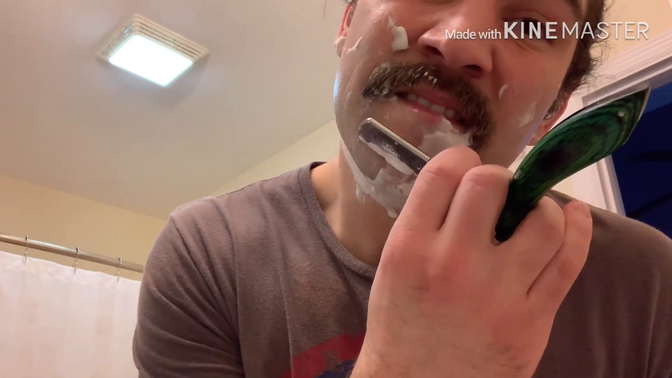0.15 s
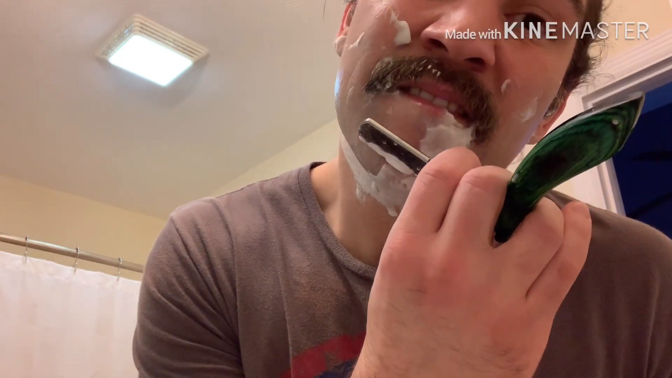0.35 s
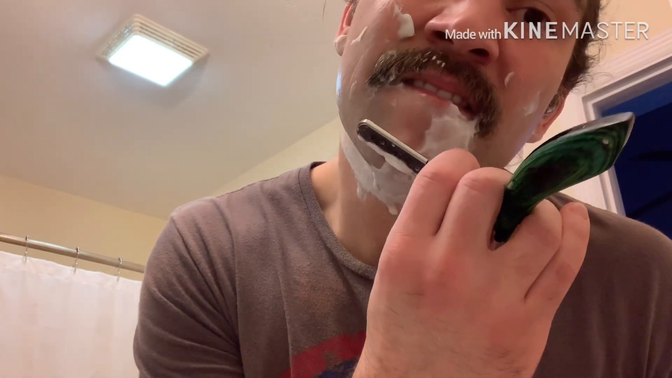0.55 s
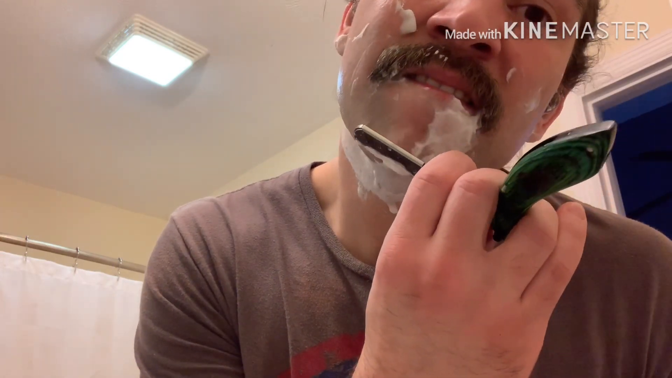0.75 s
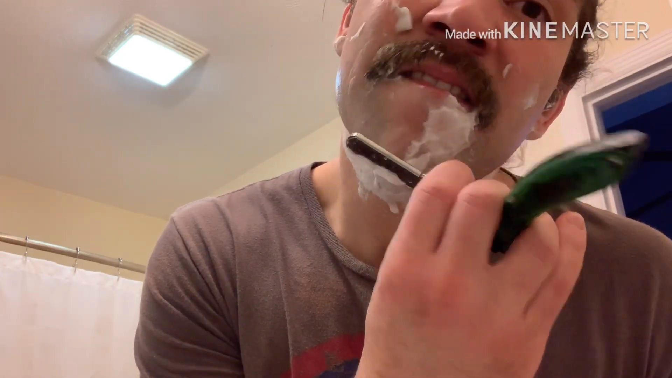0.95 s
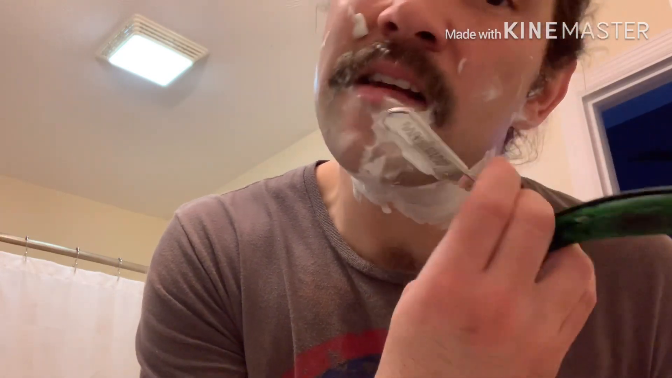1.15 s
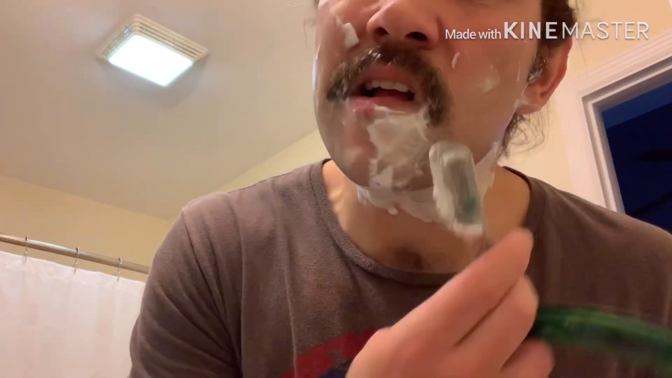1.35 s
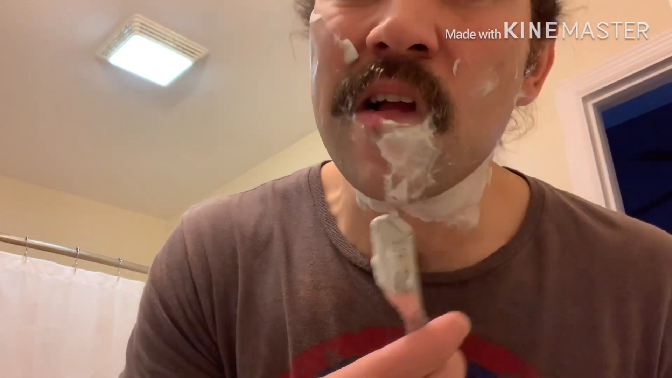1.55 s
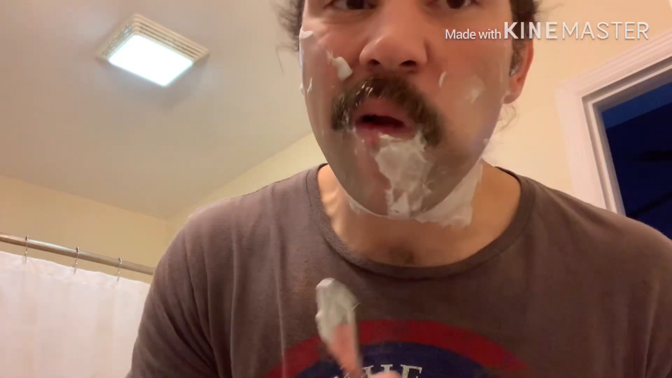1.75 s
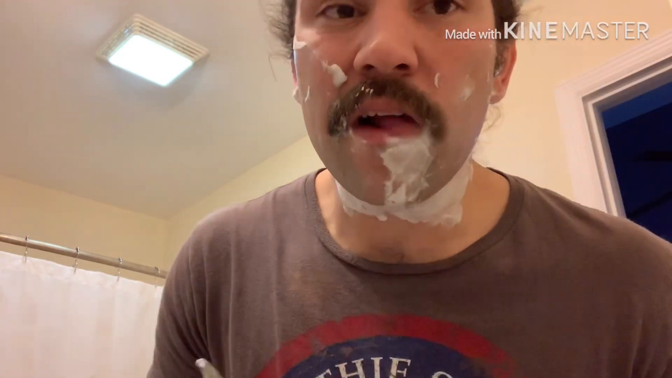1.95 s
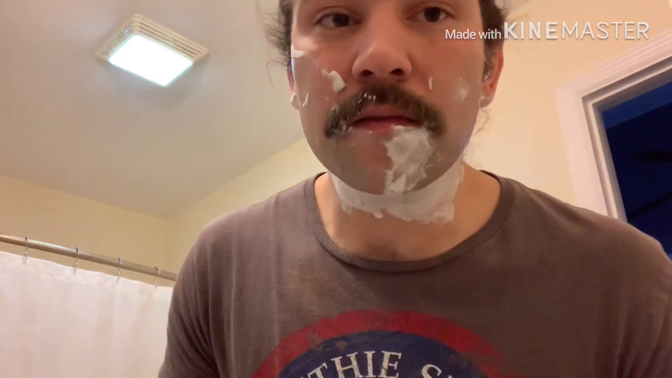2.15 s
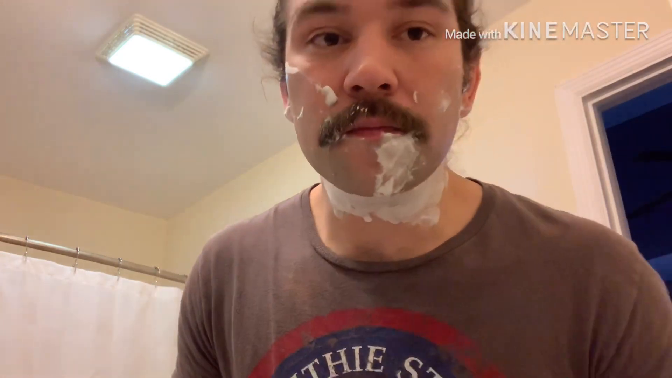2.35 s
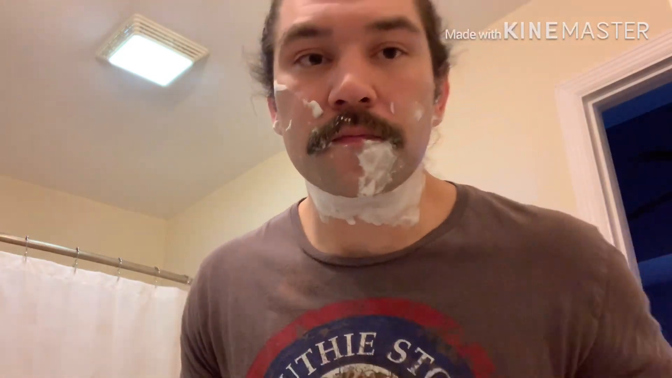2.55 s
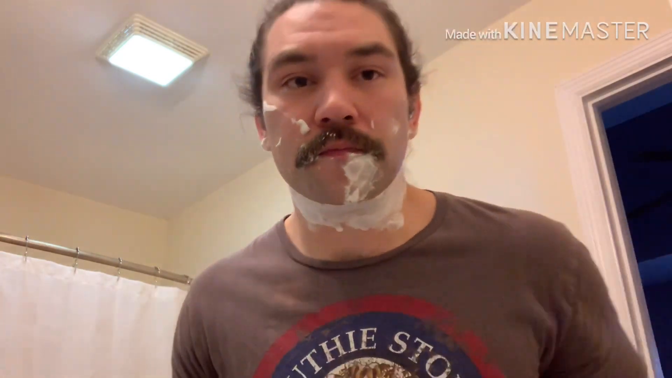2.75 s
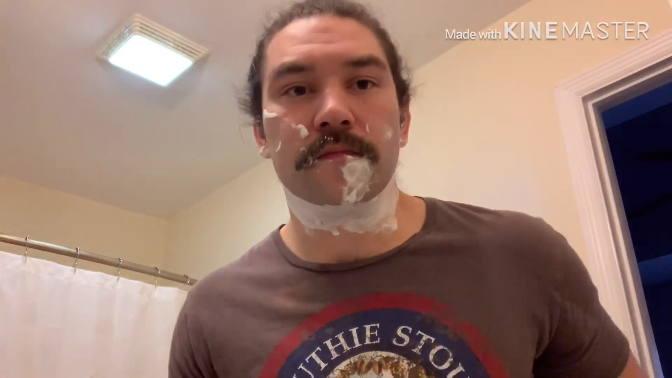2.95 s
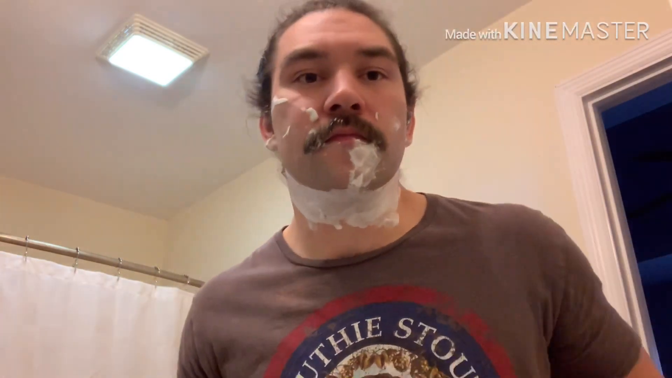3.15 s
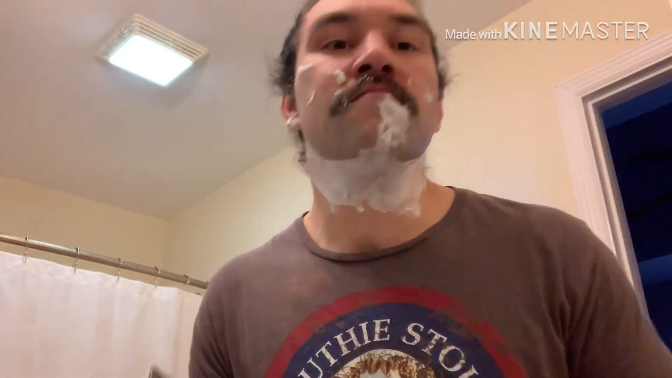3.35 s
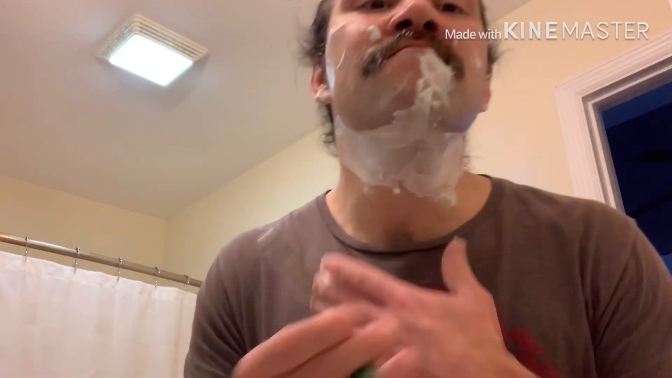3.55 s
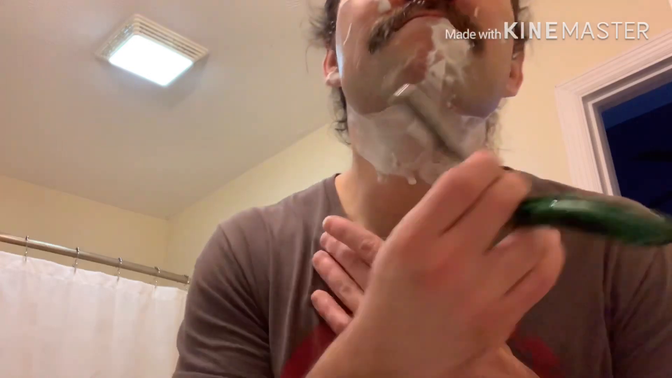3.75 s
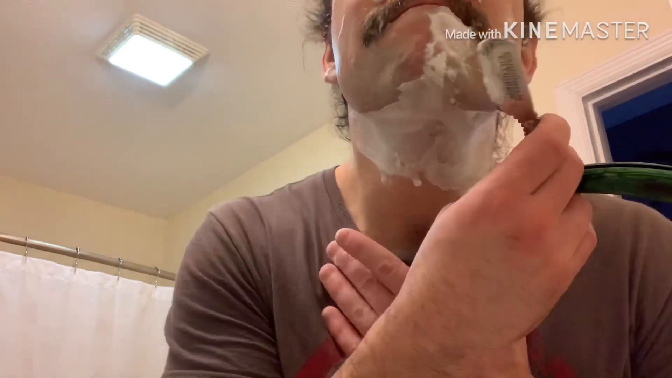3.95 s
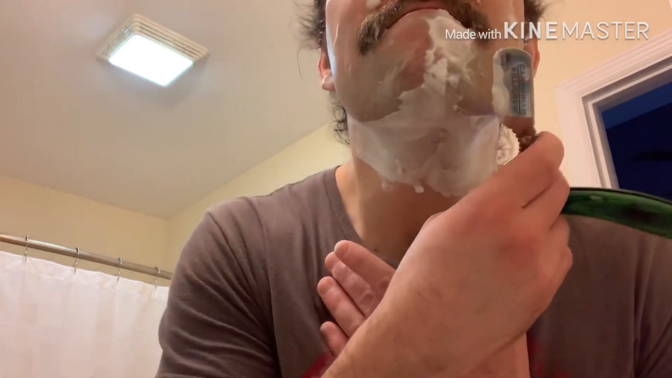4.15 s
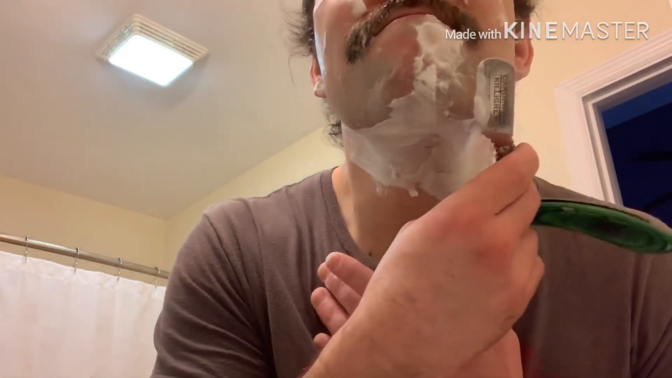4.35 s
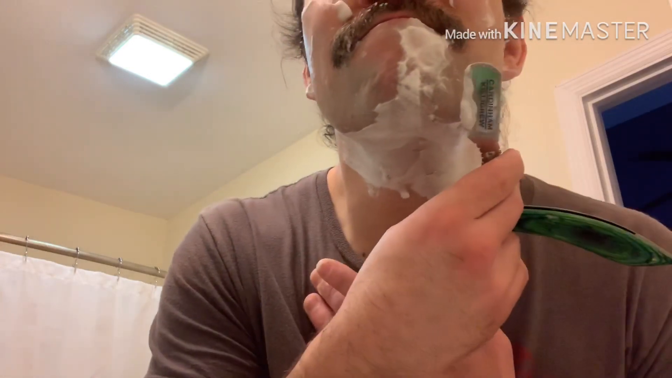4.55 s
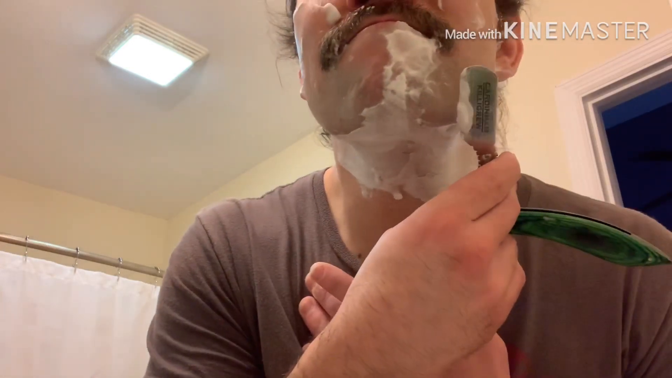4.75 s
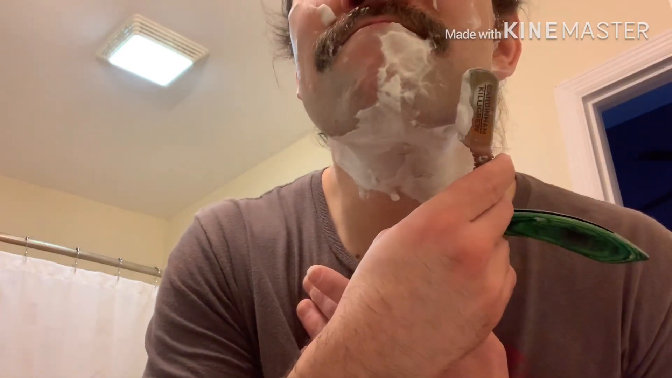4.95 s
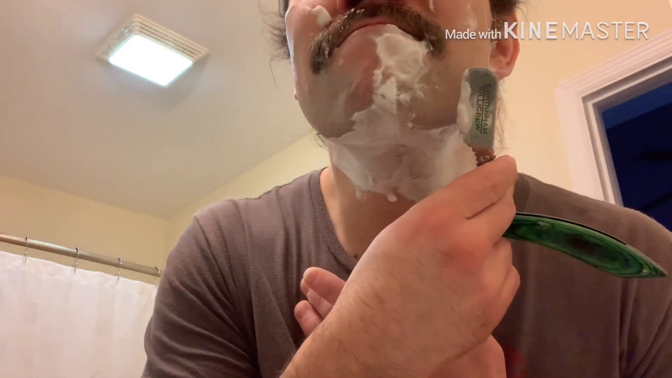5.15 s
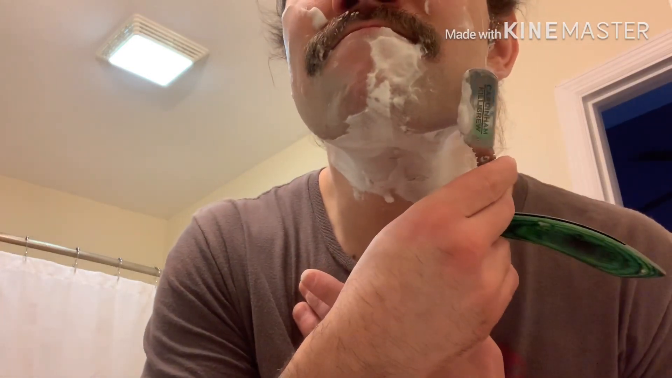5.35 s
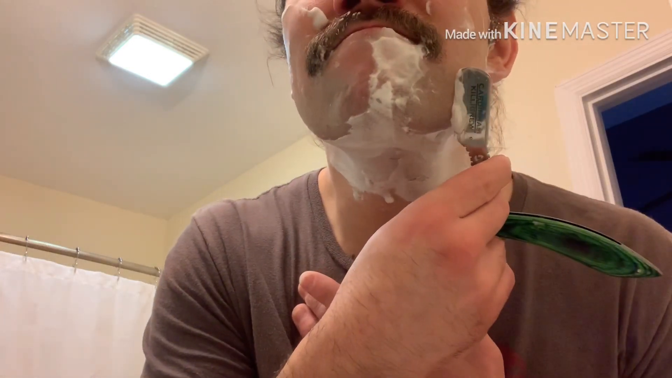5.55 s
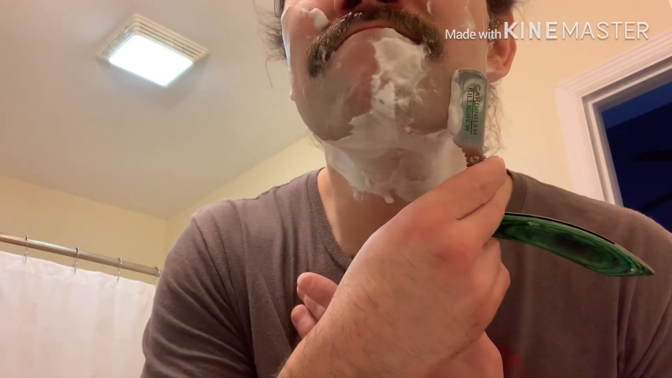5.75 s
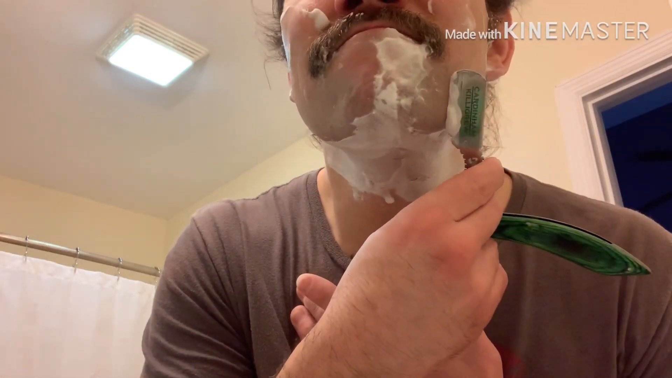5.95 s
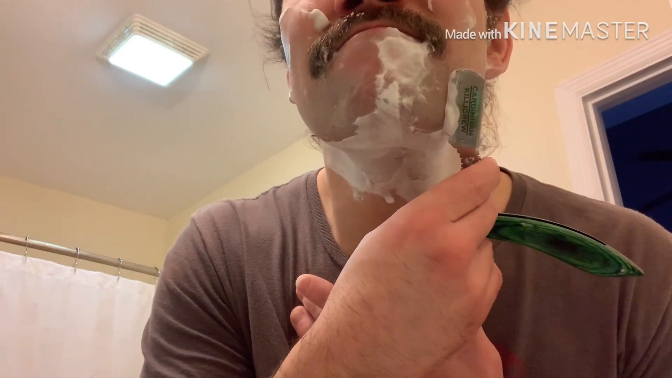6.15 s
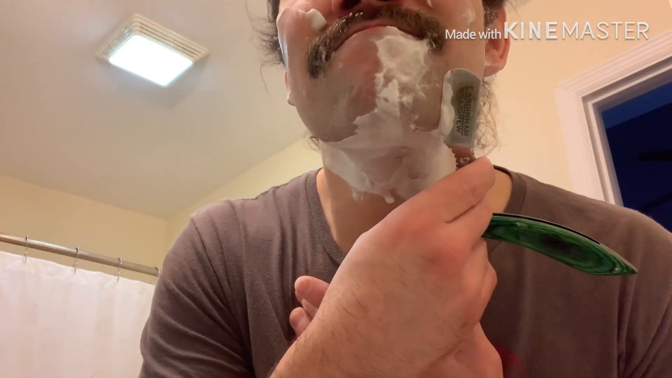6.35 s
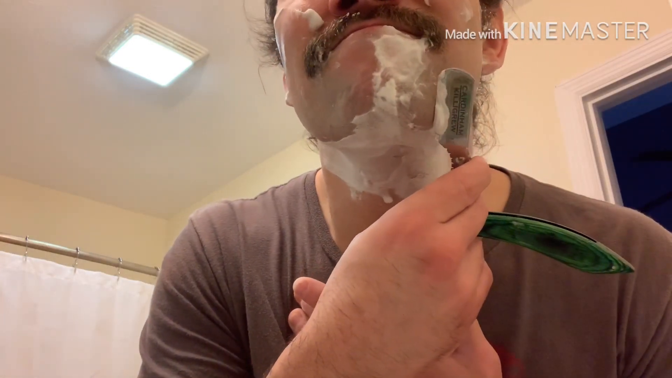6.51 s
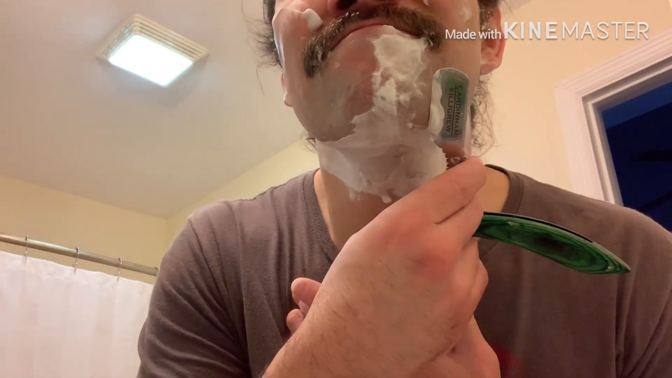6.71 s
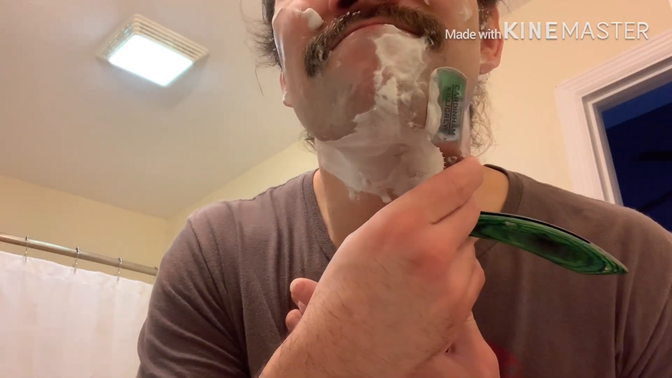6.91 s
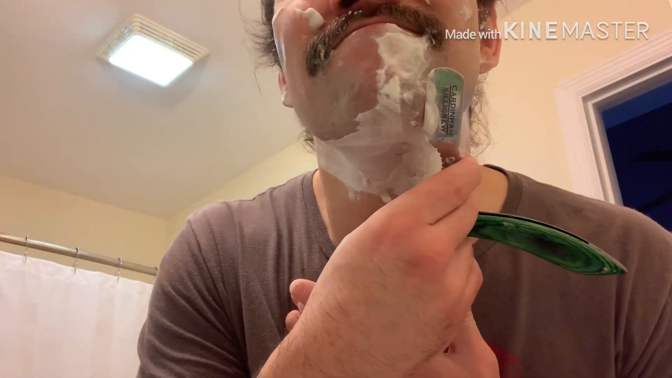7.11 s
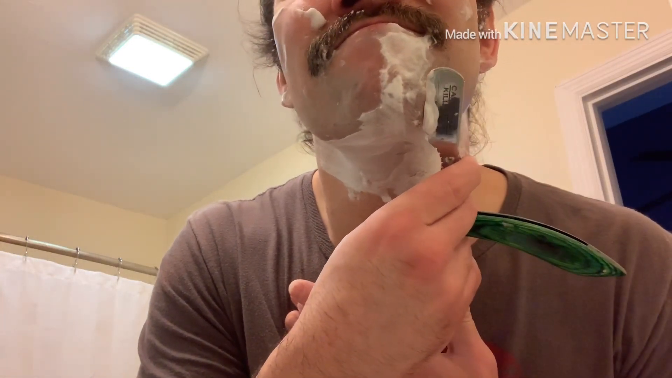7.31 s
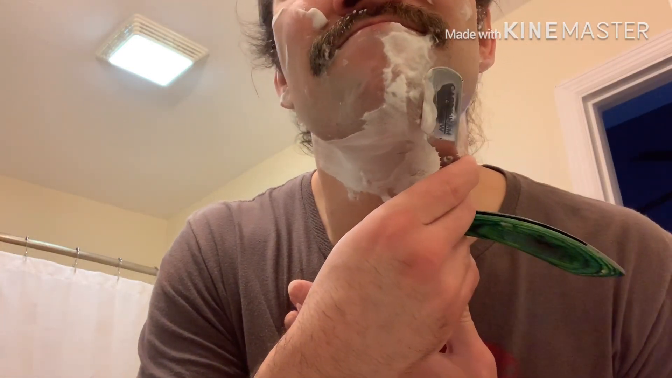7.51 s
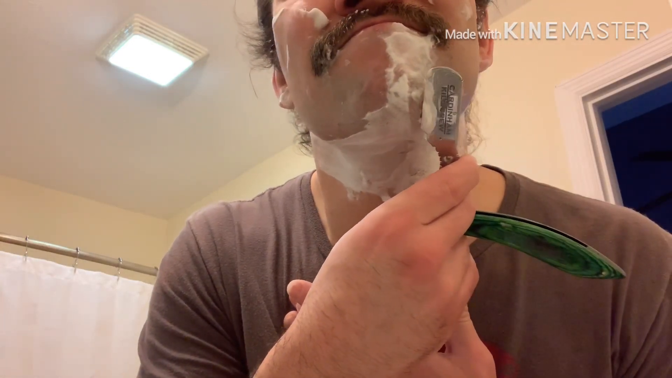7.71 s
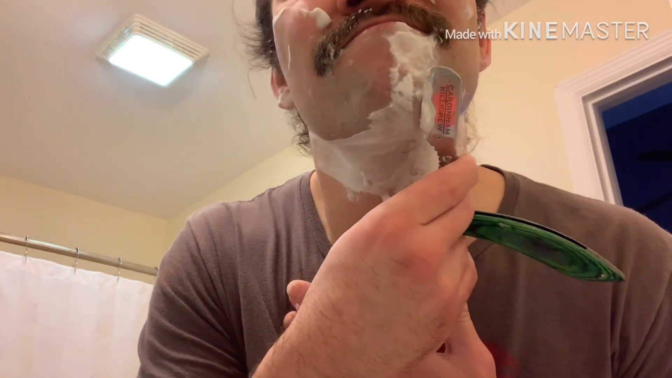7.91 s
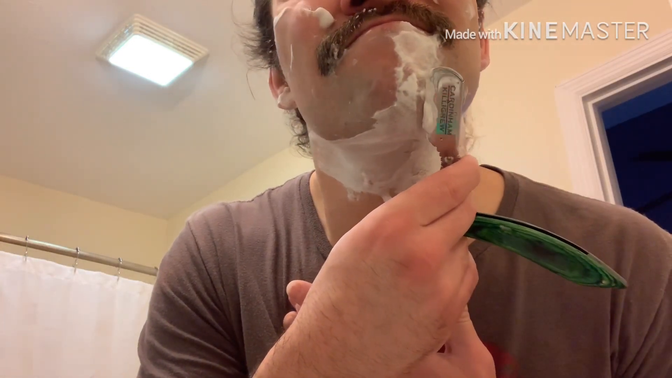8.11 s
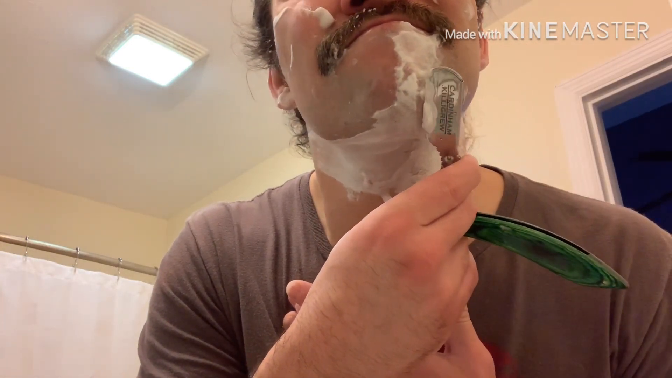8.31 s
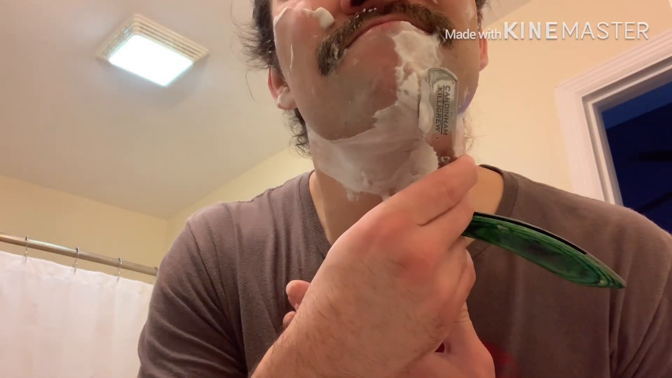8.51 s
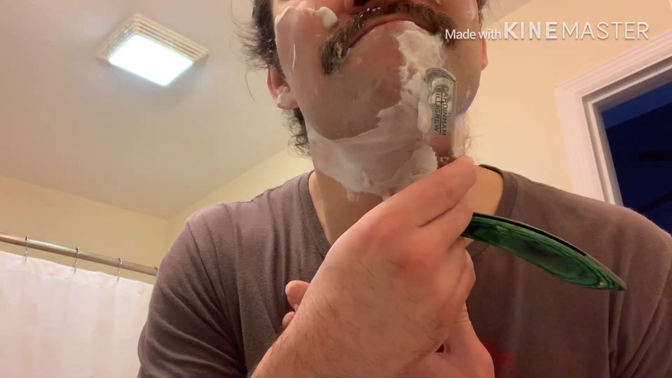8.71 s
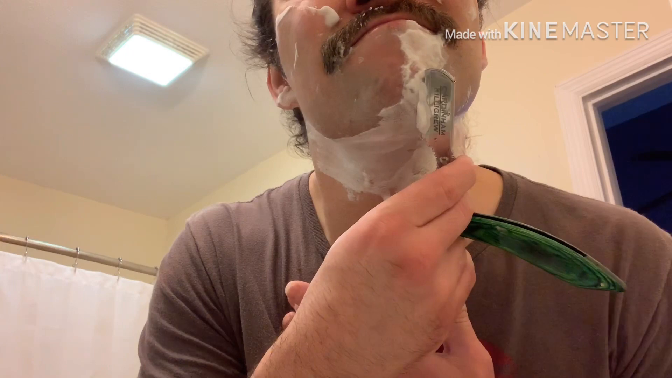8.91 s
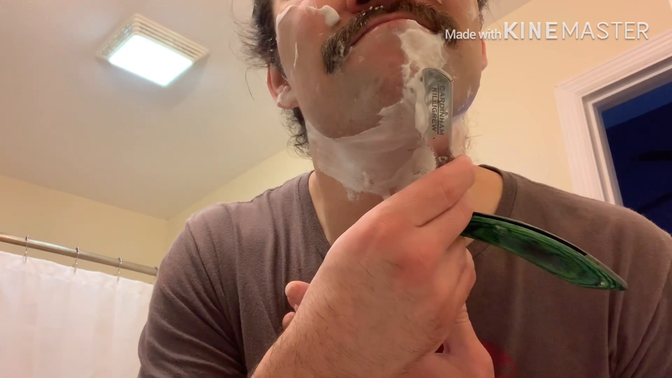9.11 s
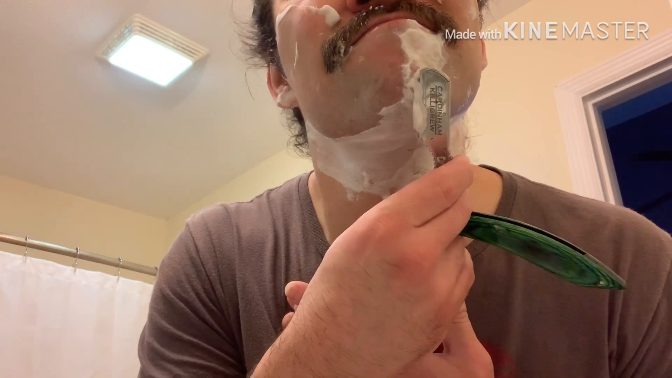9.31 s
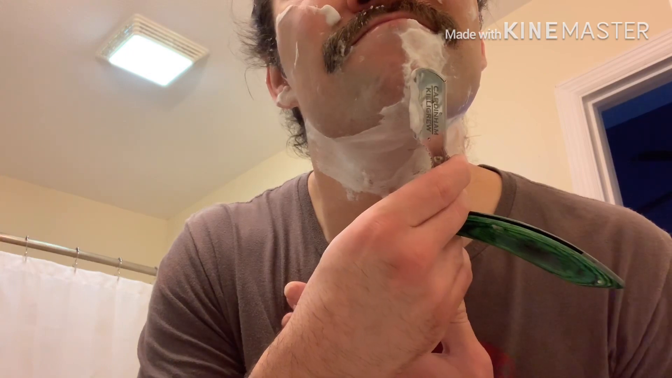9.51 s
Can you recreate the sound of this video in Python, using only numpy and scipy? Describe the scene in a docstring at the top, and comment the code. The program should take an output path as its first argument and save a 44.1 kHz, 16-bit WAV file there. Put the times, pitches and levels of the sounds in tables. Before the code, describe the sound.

Tiny dry snaps of hair being shaved open the scene over a steady low ventilation rumble. A damped clink follows, then body movement: soft cloth rustle, heavy low thuds, dull knocks and a short fine hiss of water. After wet crackling and small ringing pops, crisp scraping strokes resume, uneven and thinning out, captured close by a phone amid short tile reflections.

```python
"""A straight razor shaves stubble in a small tiled bathroom; a ceiling fan, filtered noise, rumbles throughout.
First come short strokes in which hairs snap, each a tiny burst of bright noise. Then the razor clinks, as damped
modes, and the shaver shifts: cloth rubs as dense grains, the floor thuds as resonant noise, dull knocks ring.
A tap sprays fine drops for a moment and lather crackles on the wet neck in ringing pops.
At last the strokes return, with more knocks between them, and go on to the end."""
import sys
import numpy as np
from scipy import signal
from scipy.fft import rfft, irfft
from scipy.io import wavfile
from scipy.ndimage import uniform_filter1d

SR = 44100
rng = np.random.default_rng(int(sys.argv[2]) if len(sys.argv) > 2 else 0)


def ratio(d):
    """dB to gain"""
    e = np.asarray(d, float) / 20
    return 10 ** e


def generate_wav(sig):
    """Save sig (samples, or channels by samples) to the path in sys.argv[1] as 16-bit PCM at SR."""
    pcm = np.round(np.clip(np.atleast_2d(sig).T, -1, 1) * 32767).astype(np.int16)
    wavfile.write(sys.argv[1], SR, pcm)


N = 426447
HZ = np.maximum(np.fft.rfftfreq(N, 1 / SR), 1)
T = np.arange(N) / SR


def on_hz(table):
    """Spectral envelope: a (frequency, value) table interpolated over log frequency."""
    hz, value = np.transpose(table)
    return np.interp(np.log(HZ), np.log(hz), value)


def shape(x, gain):
    """Linear filtering: the spectrum is multiplied by a gain at every frequency."""
    return irfft(rfft(x) * gain, N)


def unit(x, lo_hz, hi_hz):
    """Normalisation: the rms inside a band becomes 1."""
    inside = shape(x, (HZ > lo_hz) & (HZ < hi_hz))
    return x / np.sqrt(np.mean(inside ** 2))


def curve(rows):
    """Envelope: (time, level) rows joined straight in dB, slightly smoothed, silent outside the rows."""
    rows = np.array(rows)
    gain = ratio(np.interp(T, rows[:, 0], rows[:, 1], left=-200, right=-200))
    return uniform_filter1d(gain, size=130)


def spurt(start, rise, hold, fall, db):
    """Exponential attack and decay: both ramps are straight in dB."""
    ramp_db = 25
    full = start + rise
    end = full + hold
    return curve([(start, db - ramp_db), (full, db), (end, db), (end + fall, db - ramp_db)])


def walk(rate):
    """Slow random modulation: piecewise random values, `rate` a second, joined by a moving average."""
    k = int(SR / rate)
    return uniform_filter1d(np.repeat(rng.standard_normal(N // k + 1), k), k)[:N]


def grains(per_s, spread_db):
    """Shot noise: random clicks whose levels in dB spread exponentially, up to five spreads."""
    click = rng.standard_normal(N) * (rng.random(N) < per_s / SR)
    return click * ratio(spread_db * np.minimum(rng.exponential(size=N), 5))


def strike(times, gains):
    """Impulsive excitation: one single-sample impulse an event."""
    x = np.zeros(N)
    x[(np.array(times) * SR).astype(int)] = gains
    return x


def bursts(times, gains, lengths, size):
    """Rough contact: at each time its own noise swells and dies away, with energy gain squared."""
    x = np.zeros(N + size)
    roughness = rng.standard_normal((len(times), size))
    for s, gain, length, rough in zip(times, gains, lengths, roughness):
        t = T[:size] / max(length, 1e-4)
        push = rough * (1 - np.exp(-t / .25)) * np.exp(-t)
        first = int(s * SR)
        x[first:first + size] += gain * push / np.sqrt(np.sum(push ** 2))
    return x[:N]


def ring(modes):
    """Modal synthesis: exponentially damped sines make an impulse response of peak 1."""
    t = T[:SR // 4]
    y = sum(ratio(db) * np.sin(2 * np.pi * hz * t) * 1000. ** (-t / t60) for hz, db, t60 in modes)
    y = y * (1 - np.exp(-t / 0.0009))  # contact builds over a millisecond
    return y / np.abs(y).max()


def conv(x, response):
    """Linear system: every impulse of x sets off the response."""
    return signal.fftconvolve(x, response)[:N]


def resonances(table):
    """Resonance: gain peaks given by centre frequency, width and level."""
    return sum(ratio(db) / np.sqrt(1 + (2 * (HZ - hz) / width) ** 4) for hz, width, db in table)


# how alike two microphone ports hear diffuse sound: (frequency [Hz], coherence [0-1])
PORT_COHERENCE = [(100, 0.99), (400, 0.94), (900, 0.58), (1600, 0.27), (3000, 0)]


def diffuse(a, b):
    """Diffuse-field coherence: two unrelated sounds mix into two ports alike in the bass."""
    alike = np.clip(on_hz(PORT_COHERENCE), 0, 1)
    mid = shape(a, np.sqrt((1 + alike) / 2))
    side = shape(b, np.sqrt((1 - alike) / 2))
    return np.array([mid + side, mid - side])


# reverberation of the tiles: (frequency [Hz], decay time by 60 dB [s])
TILE_T60 = [(300, 0.58), (1500, 0.29), (5000, 0.23), (12000, 0.082)]


def room(x, wet_db):
    """Reverberation: direct sound plus a unit-energy noise tail that decays octave by octave."""
    t = T[:SR // 2]
    hz_t60, s_t60 = np.transpose(TILE_T60)
    tail = 0
    for hz in 125 * 2. ** np.arange(8):
        t60 = np.interp(np.log(hz), np.log(hz_t60), s_t60)
        octave = np.clip(1 - np.abs(np.log2(HZ / hz)), 0, 1) ** .5
        noise = shape(rng.standard_normal((2, N)), octave)[:, :SR // 2]
        tail = tail + noise * 1000. ** (-t / t60) / np.sqrt(t60)
    tail = tail * np.clip(t / 0.00043, 0, 1) / np.sqrt(np.sum(tail ** 2) / 2)
    return x + ratio(wet_db) * diffuse(conv(x, tail[0]), conv(x, tail[1]))


# spectrum of the fan's air: (frequency [Hz], relative density [dB per Hz])
FAN_SPECTRUM = [(25, -10), (60, -5.5), (200, -4.5), (400, -16), (620, -22.5), (670, -35), (800, -27),
                (950, -38), (1120, -39), (3000, -52.5), (6000, -75)]
# standing waves of the room: (frequency [Hz], width [Hz], lift [dB])
STANDING_WAVES = [(49, 25.6, 4.5), (113.5, 14, 4.5), (156.7, 15, -6.5), (207.8, 47, 0), (292.7, 18, 2.5),
                  (363, 4.7, -1), (426, 51, 0), (569, 77, 1), (726, 13, -2), (877, 66, 3)]


def fan():
    """Broadband flow noise: its level wavers a little and the room's standing waves lift it."""
    fan_db = -51
    gain = ratio(on_hz(FAN_SPECTRUM)) * (1 + resonances(STANDING_WAVES))
    air = [shape(rng.standard_normal(N), gain) for _ in range(2)]
    return unit(diffuse(*air), 20, 20000) * ratio(fan_db + .6 * walk(3))


# thuds of shifting weight: (time [s], level [dB])
WEIGHT_SHIFTS = [(1.9, -50), (2.0, -55.5), (2.184, -38.5), (2.464, -36.5), (2.54, -45), (2.67, -50.5),
                 (2.794, -45), (3.09, -51.5), (3.4, -57.5)]
# resonances of floor and walls: (frequency [Hz], width [Hz], relative level [dB])
FLOOR_MODES = [(54.3, 20, 9), (122.4, 40, 5), (153, 6, 6), (226, 81, -13), (354.6, 30, 1)]


def floor_thuds():
    """Structure-borne sound: shifting weight excites floor and walls, as noise through resonances."""
    thud = unit(shape(rng.standard_normal(N), resonances(FLOOR_MODES)), 28, 420)
    return thud * curve(WEIGHT_SHIFTS)


# cloth rustle as the shaver shifts about: (time [s], level before the touch is added [dB])
RUSTLE = [(1.24, -66), (1.256, -62), (1.33, -69.5), (1.49, -67), (1.65, -94), (1.686, -64.5), (1.76, -65),
          (1.96, -74.5), (2.088, -53.5), (2.2, -45.5), (2.284, -53.5), (2.43, -50), (2.5, -60.5),
          (2.58, -58), (2.65, -65.5), (2.79, -53), (2.906, -66.5), (2.935, -52), (3.11, -56.5),
          (3.3, -71.5), (3.43, -78), (3.54, -71.5), (3.75, -71), (3.934, -58), (4.06, -72), (4.13, -73),
          (4.256, -70), (4.422, -55), (4.52, -66), (4.66, -66), (4.86, -75.5), (5.0, -104)]
FULL_RUB_DB = -56.5


def rub_over_db():
    """Friction strength: the rustle level relative to a full rub, in dB."""
    return np.interp(T, *np.transpose(RUSTLE)) - FULL_RUB_DB


# spectrum of rubbed cloth: (frequency [Hz], relative density [dB per Hz])
CLOTH_SPECTRUM = [(250, 1.5), (500, 1), (1000, -6.5), (2000, -8), (3000, -18), (5000, -28), (8000, -50),
                  (16000, -63)]
# touch of each movement at full rub: (start time [s], dullness [dB per band], weight under 900 Hz [dB])
RUB_TOUCH = [(1.24, 0.5, 2), (1.66, -1, 0.5), (2.0, 2, 1), (2.66, 1.5, 2.5), (2.92, 0, 0.5), (3.3, -3, 0.5),
             (3.76, 1, 5.5), (4.2, 0, 4), (4.6, -1.5, 8)]


def cloth():
    """Friction noise: dense grains hiss softly; a fainter, slower rub is duller and heavier."""
    dull_per_db, weight_per_db = 0.2355, 0.247  # dB lost or gained for each dB of rub
    colour = ratio(on_hz(CLOTH_SPECTRUM))
    rub = [unit(shape(grains(per_s=6000., spread_db=2.), colour), 900, 2800) for _ in range(2)]
    rub = diffuse(*rub)
    over_db = rub_over_db()
    start, dull, weight_db = np.transpose(RUB_TOUCH)
    now = np.clip(np.searchsorted(start * SR, np.arange(N)) - 1, 0, None)
    dull = uniform_filter1d(dull[now], size=2000) - dull_per_db * over_db
    weight_db = uniform_filter1d(weight_db[now], size=2000) - weight_per_db * over_db
    edges = [900, 1500, 2500, 4000, 6000, SR]  # Hz
    hiss = 0
    for k, (lo, hi) in enumerate(zip(edges, edges[1:])):
        band = shape(rub, (HZ >= lo) & (HZ < hi))
        hiss = hiss + band * ratio(-dull * (k - 0.5) + 1.95 * walk(40))  # each band flickers on its own
    low = unit(shape(rub, (HZ < 900) * (1 + resonances(STANDING_WAVES))), 397, 1000)
    return (hiss + low * ratio(weight_db + 1.5 * walk(30))) * curve(RUSTLE)


# bands of the fine crackle: (frequency [Hz], width [Hz], level [dB], evened out as each band is normalised)
CRACKLE_BANDS = [(3100, 330, 5), (3650, 450, 0), (4330, 1400, -6)]
# when the hand is on the wet neck: (start [s], end [s])
CRACKLE_SPAN = (3.78, 4.95)
# the largest pops: (time [s], peak level before echoes [dB])
LARGE_POPS = [(3.8703, -54), (3.9325, -56), (3.9987, -51), (4.0358, -47.5), (4.0567, -59), (4.2757, -69),
              (4.2962, -62), (4.3192, -57), (4.3331, -49.5), (4.383, -52), (4.421, -55), (4.445, -53),
              (4.5282, -49.5), (4.6424, -63), (4.81, -65), (4.8566, -76)]
# ringing of a large pop: (frequency [Hz], relative level [dB], decay time by 60 dB [s])
POP_MODES = [(1900, 4, .006), (2460, -2, 0.0063), (3170, 2.5, .008), (3730, -4, 0.0085), (4440, -7, .004)]


def lather():
    """Bubble resonance: fine pops crackle with the hand's rub on the wet neck, larger ones ring singly."""
    full_db, per_db = -73.5, 2.5  # crackle at full rub, and its rise for each dB of rub
    fine = sum(unit(shape(grains(per_s=200., spread_db=2.5), resonances([band])), 500, 6000)
               for band in CRACKLE_BANDS)
    wet = (T > CRACKLE_SPAN[0]) * (T < CRACKLE_SPAN[1])
    crackle = fine * wet * ratio(full_db + per_db * rub_over_db())
    s, db = np.transpose(LARGE_POPS)
    large = conv(strike(s, ratio(db)), ring(POP_MODES))
    return room(crackle, wet_db=5.0) + room(large, wet_db=2)


# dull knocks from floor and basin: (time [s], relative level [dB], thump over it [dB], push decay [s])
DULL_KNOCKS = [(2.02, -57, 5, 0.0059), (2.075, -35.5, -15, 0.024), (2.133, -36, 5, 0.038),
               (2.565, -47.5, 3, 0.0066), (2.782, -52, 1, .0065), (3.919, -46, 8, 0.0022),
               (4, -44, 3.5, 0.0059), (4.045, -35.5, -1.5, 0.014), (4.5276, -38, -2.5, 0.013),
               (4.639, -41, -1.5, 0.014), (4.856, -54, 6.5, 0.0065), (5.057, -53.5, 5, 0.0083),
               (5.185, -56.5, 9.5, 0.018), (5.237, -61, 7, 0.0049), (5.356, -47, -4, 0.021),
               (6.571, -50, 2.5, 0.01), (7.368, -64, 13, 0.0082), (7.431, -49.5, -3, 0.0042),
               (7.47, -52.5, -2.5, 0.0056), (7.615, -59.5, 11.5, 0.018), (7.709, -52.5, -3, 0.0046),
               (7.765, -49, -8.5, 0.0034), (7.945, -41.5, -3, 0.0086), (8.193, -57, 6, 0.0056),
               (8.289, -64, 8, 0.0052), (8.407, -48.5, -22, 0.0062), (8.6164, -53, -2, 0.0087),
               (8.688, -33.5, -6, 0.0093), (8.8144, -56.5, 4, 0.0044), (9.6177, -54, 1, .0057)]
# ringing of the knocked body: (frequency [Hz], relative level [dB], decay time by 60 dB [s])
KNOCK_MODES = [(602, 1.5, 0.024), (754, -1, 0.023), (878, -4, 0.025), (1125, -3.5, 0.0076)]


def knocks():
    """Impact excitation: a short rough push rings the body; a harder contact adds an edge."""
    edge_db, edge_per_db = -41.5, 0.15  # edge of a -44 dB knock, and its rise with strength
    s, db, thump_db, length = np.transpose(DULL_KNOCKS)
    dull_colour = np.exp(-(np.log(HZ / 1600) / 0.73) ** 2)
    edge_colour = np.exp(-(np.log(HZ / 3800) / 0.2) ** 2)
    dull = shape(bursts(s, ratio(db + 14), length, size=2000), dull_colour)
    hard = shape(bursts(s, ratio(edge_db + edge_per_db * (db + 44)), length, size=2000), edge_colour)
    thump = conv(bursts(s, ratio(db + thump_db + 1), length, size=2000), ring(KNOCK_MODES))
    return room(dull + hard + thump, wet_db=1.0)


# razor against the basin: (time [s], peak level before echoes [dB])
BASIN_CLINK = [(1.771, -33)]
# ringing of razor and basin: (frequency [Hz], relative level [dB], decay time by 60 dB [s])
BASIN_MODES = [(1510, -10, 0.016), (1737, 6.5, 0.026), (2190, 0, 0.024), (2360, 4.5, 0.015),
               (3570, -15, .012), (4300, -14, 0.016), (5500, -15, 0.013)]
# ringing of the razor's handle: (frequency [Hz], relative level [dB], decay time by 60 dB [s])
HANDLE_MODES = [(1440, -3, 0.024), (2050, -3, 0.014), (3440, -9, 0.013), (4250, -13, 0.013)]


def clinks():
    """Free vibration: the handle, then the razor laid on the basin, ring in quickly damped modes."""
    handle_s, handle_db = 1.2232, -51
    s, db = np.transpose(BASIN_CLINK)
    clink = conv(strike(s, ratio(db)), ring(BASIN_MODES))
    clink += conv(strike([handle_s], ratio(handle_db)), ring(HANDLE_MODES))
    return room(clink, wet_db=-5.0)


# spectrum of fine drops: (frequency [Hz], relative density [dB per Hz])
SPRAY_SPECTRUM = [(800, -2), (2000, 6.5), (4000, 1), (8000, 0.5), (12000, -2), (14000, -6.5),
                  (16000, -10.5)]
# spurts from the tap: (start time [s], rise [s], hold [s], fall [s], level [dB])
TAP_SPURTS = [(2.797, 0.0067, .005, 0.13, -55.5), (2.883, .1, 0.19, 0.093, -57)]
# faint airy treble while the shaver moves: (time [s], level [dB])
AIRY_TREBLE = [(2.0, -96), (2.05, -77), (2.23, -70), (2.56, -71.5), (2.79, -76), (3.3, -80.5), (3.45, -86),
               (3.52, -76.5), (3.77, -75), (3.84, -84), (3.93, -73), (4.06, -75.5), (4.1, -87), (4.31, -88),
               (4.43, -73.5), (4.6, -91)]


def tap():
    """Superposed drop impacts: dense grains make a smooth spray, whose colour the airy treble shares."""
    colour = ratio(on_hz(SPRAY_SPECTRUM))
    jet = [unit(shape(grains(per_s=13000.0, spread_db=-3.0), colour), 5930, 19000) for _ in range(2)]
    return diffuse(*jet) * (sum(spurt(*row) for row in TAP_SPURTS) + curve(AIRY_TREBLE))


# the coarsest hairs, cut one by one: (time [s], relative level [dB])
COARSE_HAIRS = [(0.1235, -60), (0.1355, -43), (0.164, -50), (0.24, -51), (0.2428, -44.5), (0.3207, -49),
                (0.3755, -55), (0.4108, -55), (0.4321, -47), (0.4593, -50), (0.4725, -46), (0.5186, -51),
                (0.5478, -54), (0.6523, -54), (0.6867, -52.5), (5.9744, -48), (5.9951, -51), (6.0211, -44),
                (6.024, -43), (6.0281, -34.5), (6.041, -43), (6.122, -49.5), (6.1726, -65), (6.239, -48),
                (6.261, -44), (6.269, -41), (6.3783, -48), (6.411, -41.5), (6.422, -44.5), (6.4332, -41),
                (6.446, -39), (6.4878, -51), (6.524, -47), (6.526, -44), (6.562, -42), (6.5685, -43.5),
                (6.6091, -51), (6.6514, -45.5), (6.6807, -56), (6.7002, -45), (6.801, -45), (6.863, -53),
                (6.8773, -49), (6.897, -50), (7.112, -47.5), (7.1214, -47), (7.1435, -51), (7.1646, -48.5),
                (7.3921, -60), (7.4505, -50), (7.524, -53), (7.823, -39.5), (7.856, -47.5), (8.436, -42.5),
                (8.4625, -49), (8.735, -51), (9.1155, -44.5), (9.134, -49.5), (9.2228, -50), (9.314, -44),
                (9.3507, -39), (9.4214, -53), (9.4322, -42.5), (9.487, -50)]
# strokes of the blade: (start time [s], length [s], relative level of ordinary hairs [dB],
# thickness as lower treble minus upper treble [dB])
BLADE_STROKES = [(0.098, 0.083, -57, -20), (.239, 0.0074, -53, -16), (0.306, 0.03, -60, -25),
                 (0.377, 0.19, -67, -37), (0.626, .13, -65, -36), (5.965, 0.071, -60, -14),
                 (6.096, 0.084, -63.5, -7.5), (6.235, 0.1, -58, -7.5), (6.38, .12, -52.5, -9),
                 (6.52, 0.1, -56, -10.5), (6.654, 0.044, -54, -12), (6.786, .015, -52, -4.5),
                 (6.856, 0.035, -51, -15), (7.034, .004, -59, -20), (7.105, 0.057, -52, -16),
                 (7.381, .2, -66, -25), (7.812, 0.094, -63, -18), (7.953, 0.0046, -60, -7),
                 (8.435, 0.035, -53, -20), (8.733, 0.047, -57, -6), (8.856, .005, -52.5, -26),
                 (9.003, .005, -56, -30), (9.108, 0.024, -62, -29), (9.212, .015, -54.5, -26),
                 (9.29, 0.052, -57, -31), (9.426, 0.049, -68, -29), (9.611, 0.006, -53.5, -12)]


def hairs():
    """Random point process: coarse hairs at set times, ordinary ones scattered, the first at the stroke's start."""
    per_s, spread_db = 29, 2  # ordinary hairs within a stroke
    start, length, db, thick_db = np.transpose(BLADE_STROKES)
    place, size = rng.random((len(start), 12)), rng.standard_normal((len(start), 12))
    place[:, 0], size[:, 0] = 0, -1
    # a fractional last hair is fainter; unused places fall by 60 dB
    share = np.clip(1 + per_s * length[:, None] - np.arange(place.shape[1]), 1e-3, 1)
    ordinary_s = start[:, None] + length[:, None] * place
    ordinary_db = db[:, None] + spread_db * size + 20 * np.log10(share)
    coarse_s, coarse_db = np.transpose(COARSE_HAIRS)
    s = np.r_[coarse_s, ordinary_s.ravel()]
    db = np.r_[coarse_db, ordinary_db.ravel()]
    # every hair takes the thickness of the nearest stroke
    stroke = np.argmin(np.abs(s[:, None] - start - length / 2) - length / 2, axis=1)
    return np.c_[s, db, thick_db[stroke]]


# bright ticks from handle and tap: (time [s], relative level [dB], lower treble over it [dB])
BRIGHT_TICKS = [(1.2245, -61, -3), (1.772, -55.5, 2), (1.8445, -60, -22), (2.0333, -61, -18),
                (2.0537, -57, -22), (2.8015, -51, -13), (4.5286, -61, -15.5)]
# spectrum of a snap: (frequency [Hz], relative density [dB per Hz])
SNAP_SPECTRUM = [(2500, -23.5), (5000, -18), (8000, -4), (11000, 3), (14000, 3), (16000, -1)]


def razor():
    """Brittle fracture: each hair snaps as a very short bright tick, amid the fine scrape of the edge."""
    scrape_db = -23.5  # steady scrape during a stroke, against the stroke's level
    s, db, thick_db = np.vstack([hairs(), BRIGHT_TICKS]).T
    bright = ratio(on_hz(SNAP_SPECTRUM))
    lower_treble = np.exp(-(np.log(HZ / 6000) / 0.31) ** 4)
    tick = shape(bursts(s, ratio(db + 13.5), 0.00028 + 0 * s, size=150), bright)
    tick += shape(bursts(s, ratio(db + thick_db + 14), 0.0014 + 0 * s, size=300), lower_treble)
    # the edge keeps dragging after every snap; powers add, decaying in 2 ms
    drag = np.sqrt(np.convolve(strike(s, ratio(2 * db)), np.exp(-T[:2000] / 0.002))[:N])
    fine = unit(shape(grains(per_s=1500., spread_db=4.), bright), 8500, 13000)
    steady = sum(spurt(start - .01, 0.011, length, .04, level + scrape_db)
                 for start, length, level, _ in BLADE_STROKES)
    return room(tick + (ratio(-31) * drag + steady) * fine, wet_db=0.0)


def scene():
    """Superposition: the sound pressures of all sources add."""
    return fan() + floor_thuds() + cloth() + lather() + knocks() + clinks() + tap() + razor()


def low_pass(x):
    """Removes everything above the highest recorded frequency."""
    return signal.sosfilt(signal.butter(12, 16850, fs=SR, output="sos"), x)


# balance of the ports, left minus right: (frequency [Hz], difference [dB])
PORT_BALANCE = [(60, -.5), (250, -1.5), (500, 1), (1500, 1.6), (4000, -.5), (8000, 0)]


def record(dry):
    """Inter-channel coherence: a phone adds hiss, shares treble between its sides, right ahead, and cuts the top."""
    hiss_db, shared_hz, in_phase_hz, lead_s = -81, 6950, 10500, 1.5e-4
    hiss = shape(rng.standard_normal((2, N)), 1 / np.sqrt(1 + (HZ / 14400) ** 60))
    left, right = rfft(dry + ratio(hiss_db) * hiss)
    shared = np.clip(0.84 / (1 + (shared_hz / HZ) ** 24), 0, 1)
    turned = left * np.exp(2j * np.pi * (HZ - in_phase_hz) * lead_s)
    right = shared * turned + np.sqrt(1 - shared ** 2) * right
    top = 1 / np.sqrt(1 + (HZ / 15950) ** 160) + .03 * (HZ < 16700)
    balance_db = on_hz(PORT_BALANCE)
    both = np.array([left * ratio(balance_db / 2), right * ratio(-balance_db / 2)]) * top
    return low_pass(irfft(both, N))


dry = scene()
out = record(dry)
generate_wav(out)
```